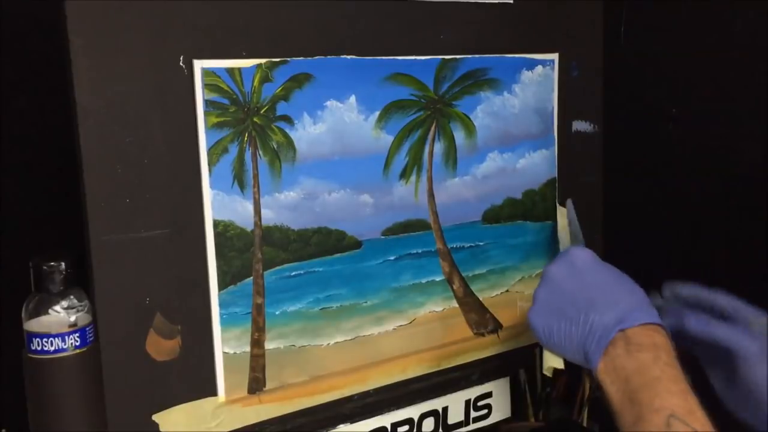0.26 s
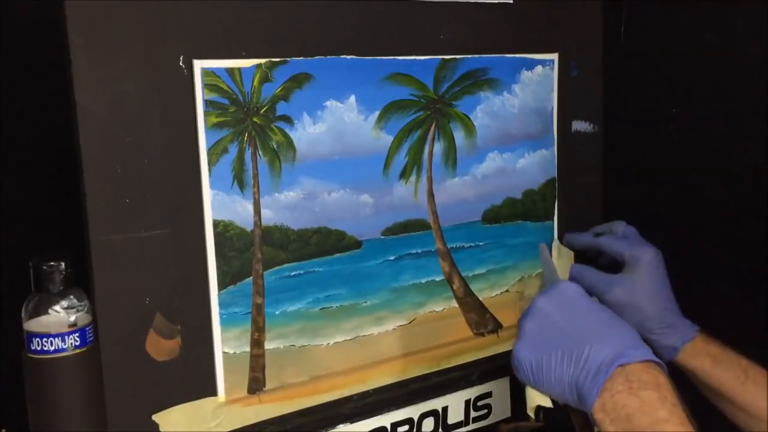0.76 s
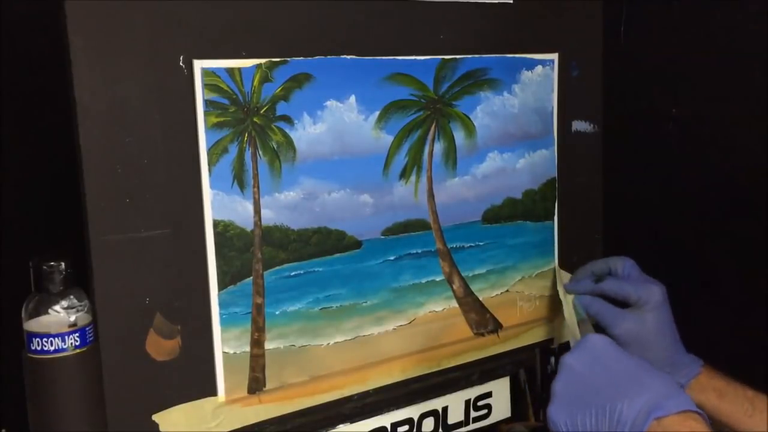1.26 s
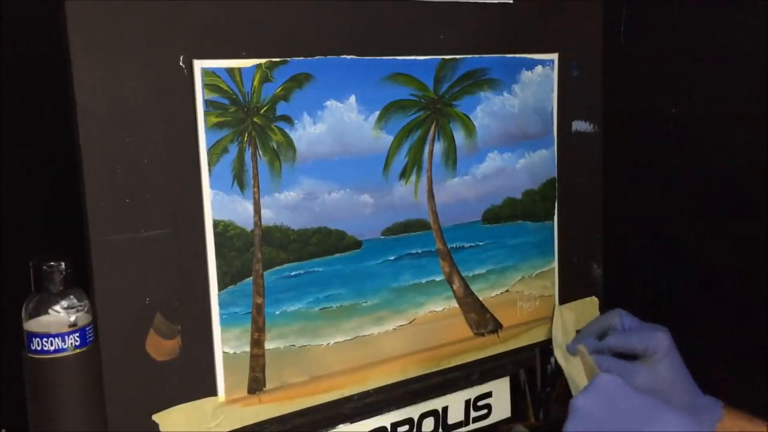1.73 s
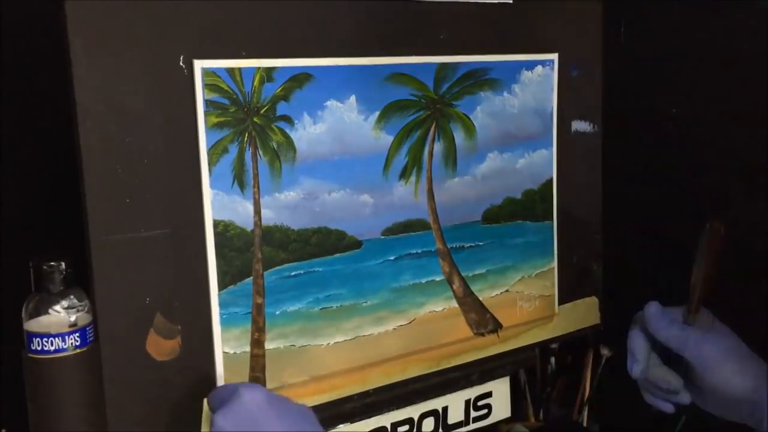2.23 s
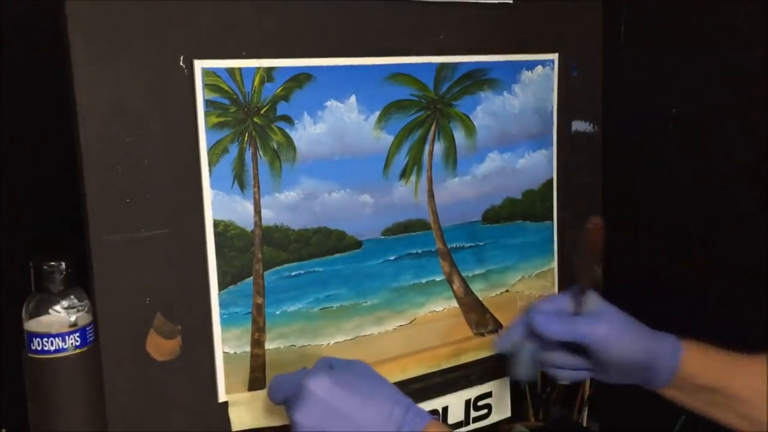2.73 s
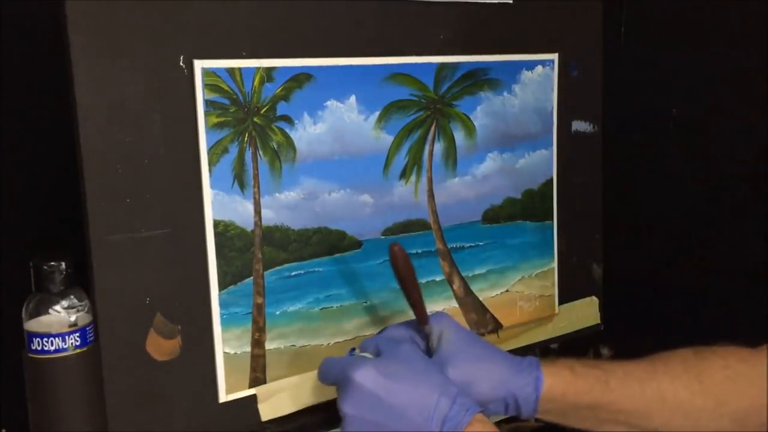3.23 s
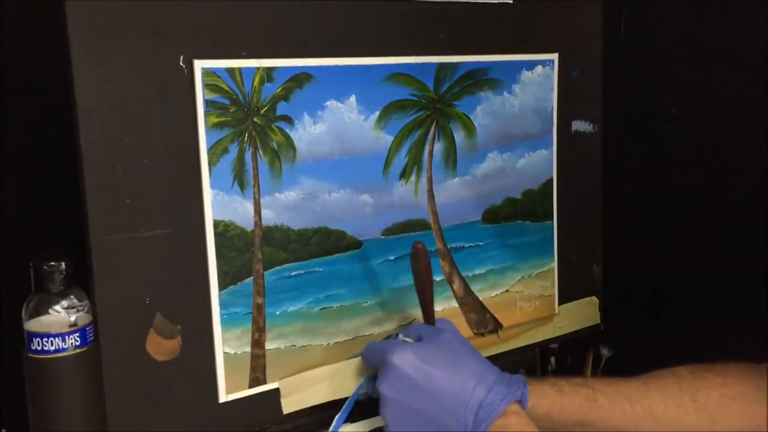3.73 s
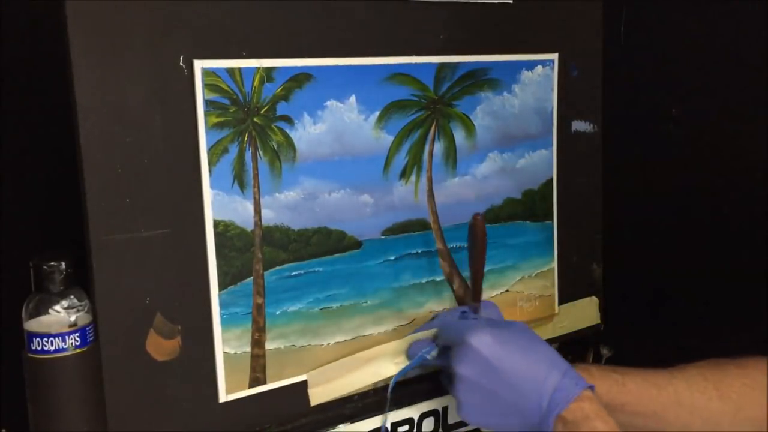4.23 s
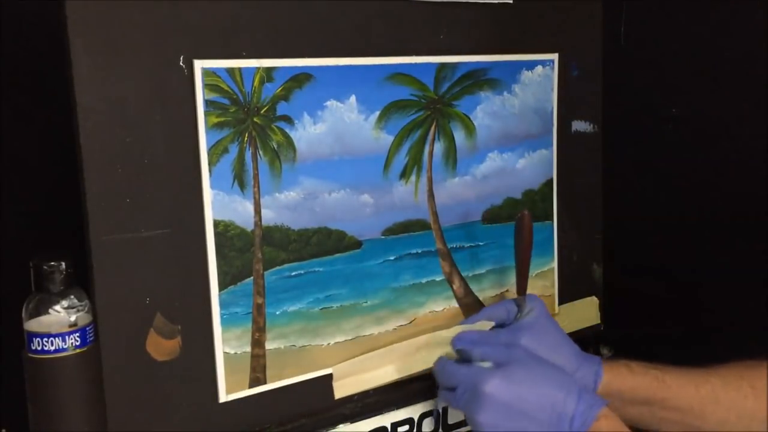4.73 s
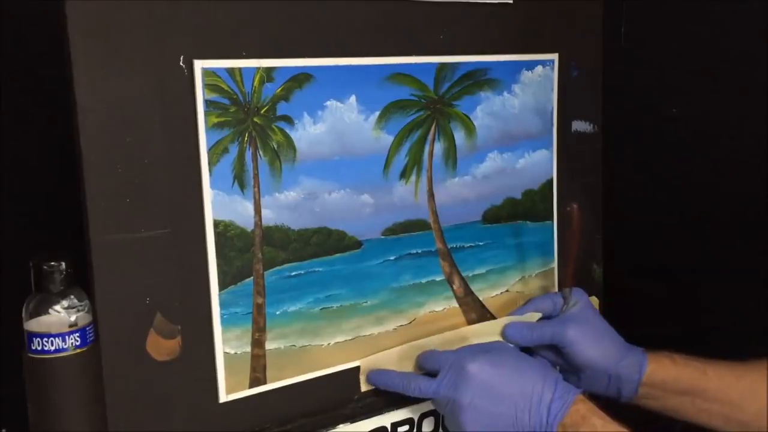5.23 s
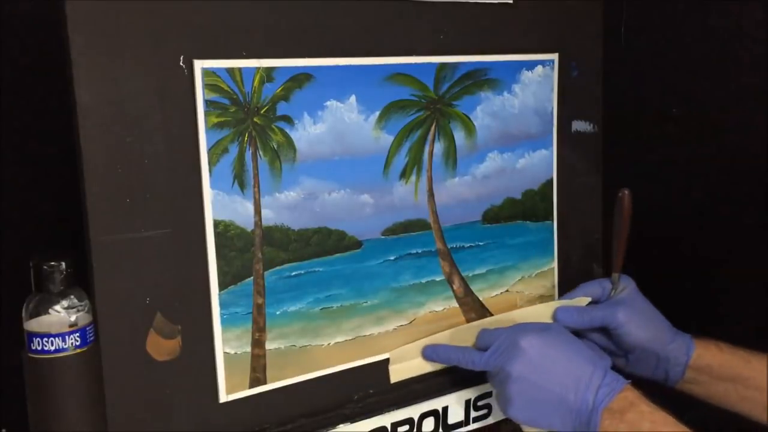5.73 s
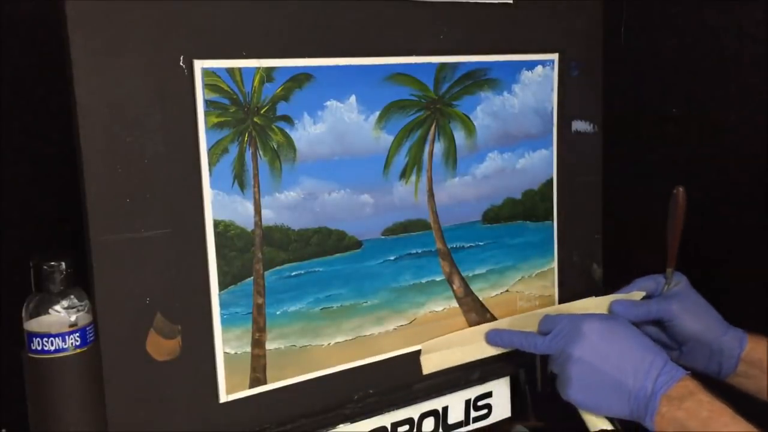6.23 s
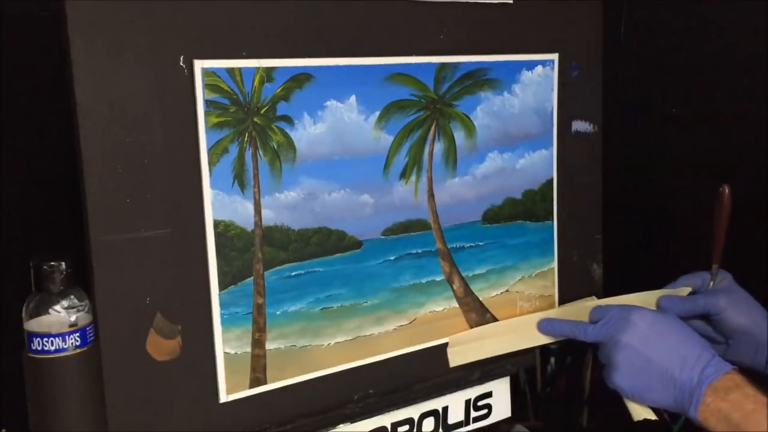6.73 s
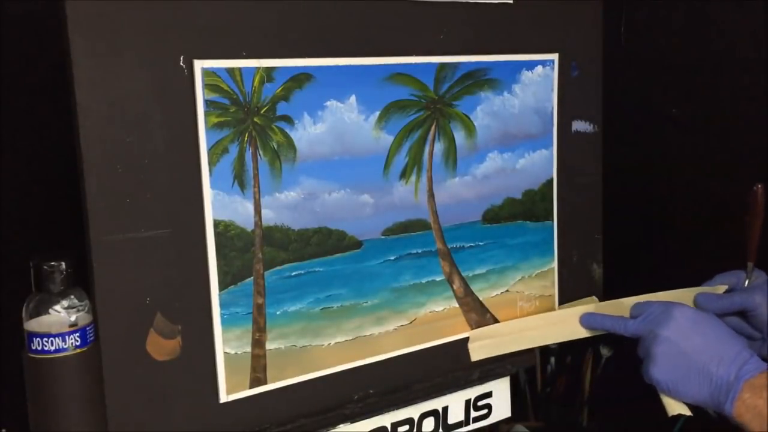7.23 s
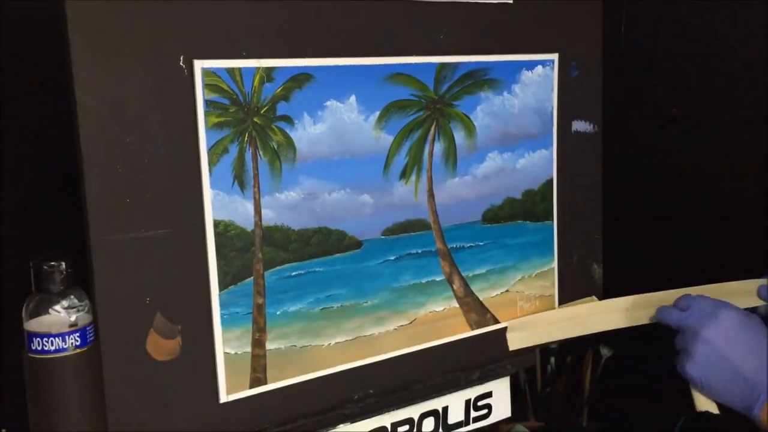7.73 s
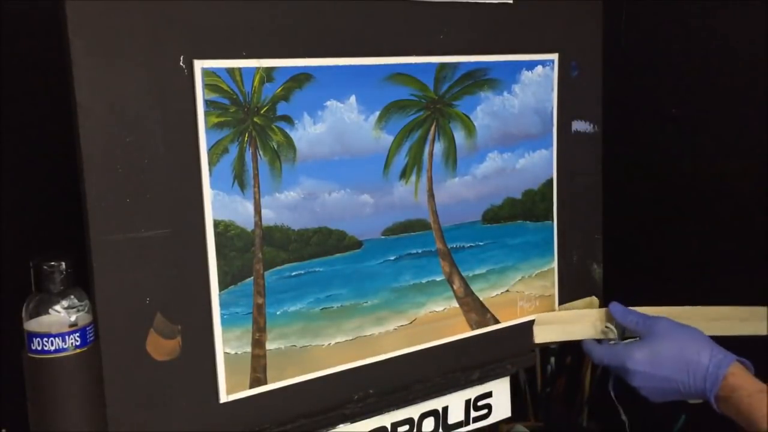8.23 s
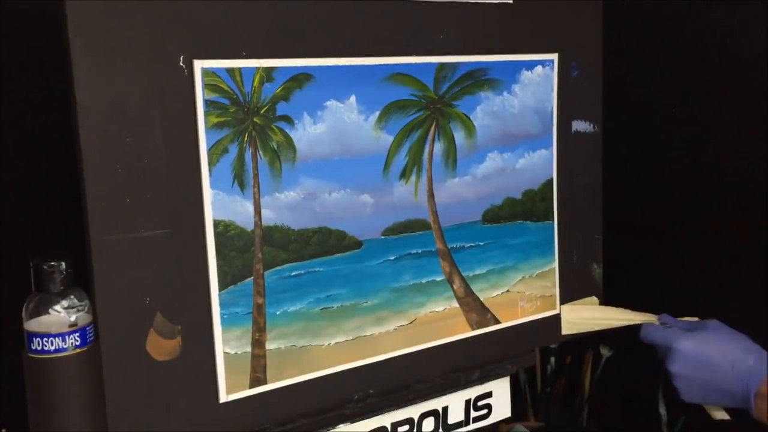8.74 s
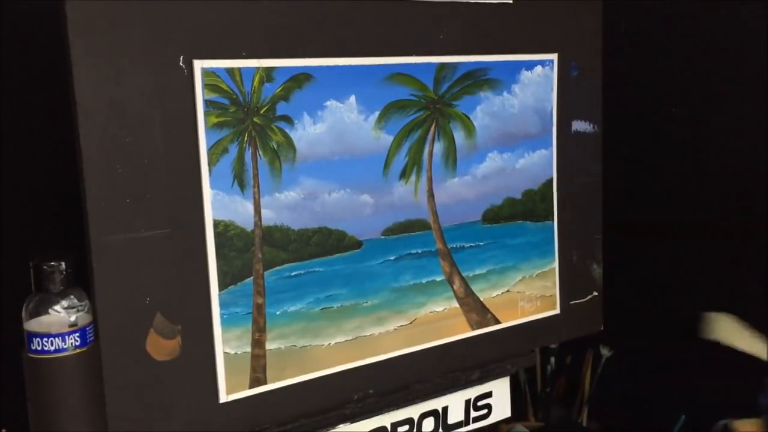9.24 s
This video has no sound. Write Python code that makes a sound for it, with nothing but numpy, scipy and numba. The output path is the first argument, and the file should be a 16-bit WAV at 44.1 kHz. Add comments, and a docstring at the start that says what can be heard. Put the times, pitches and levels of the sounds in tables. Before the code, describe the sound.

Close, dry sound of paper masking tape peeled from a board in a small room, over a faint low machine hum and soft dull background noise. A rasping rip opens at once, with a very loud snap at about 0.15 s, then shorter tears until 0.8. From 1.2 to 1.8 a smoother, even crackle runs, breaking into brisk rips around 1.8-2.2 as the first strip comes free. A quieter fumbling gap follows, with a few hollow snaps near 2.5-2.8 and a deep soft thump at 3.0. A sharp snap at 3.1 starts the next strip: sparse, uneven ticks to 4.7, more frequent crisp snaps from 4.8 to 6.8, a dip near 7, then dense crackle from 7.2 to 8. Low thumps fall near 4.1 and 6.0. Strong tears with frame jolts come at 8.45, 8.8 and 8.9, the hardest rip at 9.15-9.25, then last small ticks before 9.5.

```python
"""Paper masking tape is pulled off the edges of a painting on a board, an arm's length from a small microphone.
The glue lets go in a patchy crackle of noise bursts, one per tiny slip, and in lone snaps that ring the taut paper.
Two drifting resonances, narrow creases and a moving hollow colour the loose strip; the board knocks along.
The easel rumbles in filtered noise and deep thumps. A small room answers briefly over a low machine hum
and low background noise, strongest around 110 Hz."""
import sys
import numpy as np
from scipy import signal
from scipy.fft import rfft, irfft, next_fast_len
from scipy.io import wavfile
from scipy.ndimage import uniform_filter1d, map_coordinates
from numba import njit

SR = 44100
rng = np.random.default_rng(int(sys.argv[2]) if len(sys.argv) > 2 else 0)


def waveform_to_disk(signal):
    """Save audio, clipped to [-1, 1], as 16-bit WAV at the path in sys.argv[1]."""
    frames = np.transpose(np.atleast_2d(signal))
    scaled = np.clip(frames, -1, 1) * 32767
    samples = np.round(scaled).astype(np.int16)
    wavfile.write(sys.argv[1], SR, samples)


N = 417627
MS = np.arange(0, N / SR + .001, .001)  # times in seconds, a millisecond apart

# All crackle and snap levels are sends, ahead of the strip, mix trims and room.
# Steady pull on the tape between tugs: time_s, level_db
STEADY_PULL = [(0.0, -52), (0.3, -85), (0.62, -49.5), (0.84, -55), (1.0, -56), (1.12, -66.5), (1.22, -47),
               (1.79, -47.5), (1.96, -51), (2.01, -52), (2.2, -59), (2.253, -50), (2.26, -75), (2.3, -69),
               (3.04, -67), (3.2, -52.5), (3.43, -53), (3.54, -65.5), (3.77, -64), (3.86, -55.5),
               (4.73, -55), (5.7, -52), (6.0, -46.5), (6.9, -53), (6.99, -59), (7.36, -45), (7.8, -46.5),
               (7.93, -50), (8.15, -51.5), (8.4, -50.5), (8.66, -61), (9.47, -70)]
PULL_TREBLE_DB, PULL_BOARD_DB = -3.5, -20.5  # relative to the steady crackle
BOARD_REST_DB = -71  # floor under the board's share: it never rests quite
# Tugs that tear a stretch of glue at once: start_s, hold_s, level_db, treble_db, board_db (both re level)
TUGS = [(0.067, 0.13, -37.5, -10.5, -21), (0.414, 0.065, -41.5, -5.5, -18), (0.497, 0.066, -42, -7.5, -21),
        (0.686, 0.027, -49, -9, -20), (1.827, 0.082, -42, -0.5, -18), (1.93, 0.0057, -36, -2, -21),
        (2.051, 0.021, -39.5, 1, -24), (2.111, 0.011, -38.5, -4, -27), (2.167, 0.019, -42, -13, -11),
        (2.386, 0.12, -53, -5.5, -11), (2.544, 0.052, -49.5, -5, -15), (2.735, 0.1, -49, -9, -11),
        (2.854, 0.095, -48, -6, -9), (3.098, 0.049, -45.5, -4, -15), (3.222, 0.026, -48.5, -1, -24),
        (3.649, 0.025, -48.5, -5, -16), (4.328, 0.042, -52, -3, -9), (4.56, 0.033, -54, -13, -12),
        (4.834, 0.011, -46, -1, -17), (4.952, 0.037, -55, 3, -7.5), (5.235, 0.024, -50.5, -1.2, -23),
        (5.447, 0.012, -52, 1, -17), (5.59, 0.041, -53, 4, -13), (5.736, 0.011, -45, -3, -10.5),
        (5.994, 0.018, -52, 5, -10), (6.246, 0.037, -46.5, -1, -32), (6.495, 0.14, -49.5, -4, -15),
        (6.709, 0.039, -46, -8, -9.5), (7.033, .015, -60, -11, -32), (7.758, 0.051, -43.5, -4, -11.5),
        (8.065, 0.02, -44, -7, -18.5), (8.243, 0.053, -47, -3, -14), (8.432, 0.032, -39, -6, -14.5),
        (8.496, 0.065, -39, -7.5, -14.5), (8.568, 0.034, -45, -2, -10), (8.79, 0.027, -39, -7, -10),
        (8.933, 0.01, -38, -8, -9.5), (9.064, 0.01, -55, -10, -6), (9.159, 0.031, -32.5, -10, -10),
        (9.18, 0.046, -33.5, 0.5, -17), (9.231, 0.029, -33, -15, -8.5), (9.337, 0.03, -48, -19, -17),
        (9.426, 0.013, -40.5, -8, -14.5)]
TUG_RISE_DB_PER_S, TUG_FALL_DB_PER_S = 324, 248
# Louder snaps of the glue: start_s, peak_db, pitch_hz of the free paper, treble_db, board_db (both re peak)
SNAPS = [(0.0653, -26, 3730, -2, -29), (0.125, -20.5, 4390, -10, -18), (0.1485, -10.5, 1840, -10, -19),
         (0.1521, -3.5, 2840, -27, -23), (0.4093, -25.5, 3930, -5, -16), (0.431, -33, 4470, -8, -22),
         (0.482, -31.5, 3600, 6, -31), (0.5162, -28, 2120, -4, -26), (0.6364, -29, 6760, -2, -29),
         (0.6437, -31, 4310, -6, -25), (0.666, -30, 5400, -8, -30), (0.67, -26.5, 3760, -6, -32),
         (0.7637, -33.5, 5360, -4, -27), (0.868, -32, 5560, -8, -31), (0.974, -36, 7100, 0, -26),
         (1.1874, -37, 3980, -7, -22), (1.2061, -27, 3600, -10, -25), (1.235, -29, 4050, 4, -30),
         (1.319, -28, 4200, -1, -7), (1.39, -34, 4240, -4, -25), (1.459, -30, 2410, -5, -18),
         (1.5036, -23.5, 5600, -3, -20), (1.8462, -30, 6720, 5, -24), (1.86, -24, 6240, -9, -30),
         (1.8828, -26.5, 2360, 5, -17), (1.908, -29, 4520, 9, -30), (1.914, -18.5, 6890, 1, -27),
         (1.9213, -17.5, 5500, -2, -31), (1.935, -17, 6070, -6, -30), (2.0435, -20.5, 2130, -21, -24),
         (2.109, -25, 2600, -1, -9), (2.1127, -27, 1800, -2, -15), (2.121, -33, 2500, -7, -12),
         (2.1162, -18, 4140, 1, -13), (2.198, -29, 2700, 0, -2), (2.2035, -23.5, 2630, -17, 0),
         (2.38, -27.5, 1640, -8, -11), (2.5233, -18.5, 3100, -7, -13.5), (2.5397, -24.5, 6760, -2, -29),
         (2.7383, -16, 4000, -4.5, -16.5), (2.7605, -29, 2680, -5, -20), (2.7675, -26.5, 4050, 1, -17),
         (2.802, -26, 4260, -3, -19), (2.8168, -33, 5500, -3, -26), (2.8323, -16.5, 1680, -7, -17),
         (2.856, -29, 4250, -8, -24), (2.8667, -29, 4240, -6, -26), (2.873, -28.5, 4440, -12, -19),
         (3.0873, -10.5, 2800, -13, -25), (3.128, -23.5, 4050, -7, -35), (3.1796, -29, 4180, -3, -25),
         (3.203, -25.5, 5210, 3, -36), (3.2224, -32, 4220, -4, -33), (3.243, -26, 4360, -3, -35),
         (3.294, -25, 4420, -2, -34), (3.301, -25.5, 4390, 2, -34), (3.31, -26, 2520, -4, -30),
         (3.5872, -35.5, 2660, -2, -33), (3.621, -35, 4390, -2, -26), (3.6641, -26.5, 2550, -4, -11),
         (3.6822, -30, 5940, 1, -26), (3.865, -32, 6100, -6, -13), (3.9793, -26.5, 2280, -5, -8.5),
         (4.0148, -32, 2430, 1, -10), (4.0804, -35, 2330, 4, -9), (4.088, -20.5, 7450, -4, -15.5),
         (4.1339, -23.5, 7450, -6, -14.5), (4.1822, -31.5, 2110, 8.5, -13), (4.1884, -28.5, 1940, 1, -13),
         (4.2996, -27.5, 3920, 4, -21), (4.325, -27, 5680, -1, -28), (4.344, -23.5, 5600, -1, -15.5),
         (4.4224, -27, 5660, 4, -16), (4.5303, -17.5, 7750, 7.5, -38), (4.584, -28, 5140, 2.5, -24),
         (4.626, -24.5, 4340, -11, -35), (4.687, -30, 4540, -14, -13), (4.7887, -19.5, 4800, 2, -13),
         (4.8195, -33, 5730, -6, -27), (4.898, -21, 5800, -4, -37), (4.9318, -25.5, 5800, 2, -32),
         (4.955, -25, 2750, 4, -29), (4.96, -23.5, 5660, 1, -30), (4.9655, -23.5, 5800, -3, -32),
         (5.0226, -27.5, 5560, 2, -35), (5.0738, -23.5, 2740, 0, -15), (5.121, -32, 2500, -11, -22),
         (5.2158, -25.5, 5000, -2, -15), (5.2435, -34, 5300, 2, -24), (5.3012, -31, 2410, 1, -10),
         (5.3278, -25.5, 5100, -4, -37), (5.3523, -26.5, 2640, -3, -30), (5.446, -23.5, 7060, 0, -21),
         (5.5492, -30, 5600, 7, -29), (5.5534, -26, 5600, 4, -14), (5.58, -32, 5650, 0, -25),
         (5.619, -23.5, 7160, 4, -15.5), (5.656, -25.5, 5510, -1, -14.5), (5.6758, -28.5, 4690, 2, -14),
         (5.703, -29.5, 2650, 4, -25), (5.725, -25, 5470, -12, -22), (5.743, -17, 4540, -5, -21),
         (5.7672, -22.5, 5430, 3.5, -32), (5.806, -23, 2570, 3.5, -13.5), (5.858, -27.5, 2760, 1, -31),
         (5.879, -19, 3500, -1.5, -14), (5.8823, -20, 6140, -5, -20), (5.913, -26, 2930, -7, -23),
         (5.9365, -19.5, 2740, -6, -27), (5.9866, -15.5, 6030, -2, -29), (6.015, -23, 2670, 2, -18),
         (6.029, -24, 2710, -7, -18), (6.0463, -16.5, 5770, -12, -30), (6.0901, -26.5, 2500, 6, -36),
         (6.111, -19, 5810, -3.5, -16.5), (6.148, -28, 5250, 5, -27), (6.1978, -18.5, 2500, -3, -14),
         (6.23, -24.5, 2330, -3, -22), (6.2459, -20, 2300, -8, -17), (6.3157, -24.5, 2500, -6, -15),
         (6.479, -22.5, 5750, 0.5, -16), (6.5484, -19, 3500, -3, -11), (6.6742, -24.5, 2450, -3, -25),
         (6.6823, -20, 5560, -10, -14), (6.706, -28.5, 2500, -11, -12), (6.7554, -23, 7190, -5, -24),
         (6.7807, -23, 5850, -6, -19), (6.8207, -32, 2670, -3, -27), (6.8446, -20.5, 2570, 3.5, -14.5),
         (7.021, -26, 5640, 0, -24), (7.032, -30.5, 6930, 3, -35), (7.168, -27, 2500, 3, -38),
         (7.226, -35.5, 2530, 1, -18), (7.2588, -23.5, 6160, 4, -12), (7.2889, -29.5, 2530, -8, -28),
         (7.326, -30, 2430, -1, -24), (7.343, -28, 2500, 7, -32), (7.3701, -21, 2540, -1, -23),
         (7.4062, -23, 2500, 2, -26), (7.4174, -20.5, 5930, -7, -22), (7.449, -33, 5940, -4, -29),
         (7.4725, -18.5, 5810, -1.5, -33), (7.5115, -24.5, 5680, -6, -36), (7.525, -25.5, 5860, -10, -36),
         (7.5664, -22, 6500, 2, -23), (7.583, -27, 5860, -7, -30), (7.605, -23, 6930, -6, -30),
         (7.619, -29.5, 2630, -10, -25), (7.6416, -22, 3440, 0, -18), (7.661, -26, 5830, 2, -29),
         (7.685, -27, 5280, -1, -25), (7.704, -26, 5470, -11, -27), (7.7154, -17.5, 2800, 5, -15),
         (7.7534, -22, 5640, -9, -26), (7.7711, -23, 4740, -3, -25), (7.814, -24, 5770, -4, -17),
         (7.8327, -23, 2950, -6, -24), (7.8374, -20, 6930, 3, -28), (7.848, -26, 5900, -9, -29),
         (7.883, -27.5, 2700, -9, -17), (7.9132, -25, 2950, 0, -37), (7.9584, -23.5, 2910, 0, -33),
         (8.0267, -24, 6370, -3, -20), (8.0592, -20, 5700, 0, -18), (8.081, -29, 5920, -11, -24),
         (8.111, -32.5, 5680, 0, -9), (8.1813, -31.5, 3200, 0, -29), (8.196, -23, 5560, -11, -27),
         (8.2268, -28.5, 2370, 5, -26), (8.2418, -20, 6160, -7, -27), (8.264, -27.5, 6550, -3, -10),
         (8.299, -20.5, 6370, -4, -27), (8.3235, -31, 5120, 5, -20), (8.3554, -22.5, 2500, -6, -11.5),
         (8.489, -16, 2800, -5, -13), (8.554, -25, 4260, -13, -18), (8.592, -22.5, 4340, -1, -15),
         (8.7493, -28.5, 5680, -2, -22), (8.79, -23.5, 3360, -5, -3), (8.8102, -22, 5640, -13, -13),
         (8.9283, -25, 3320, -13, -18), (9.003, -34, 2000, -8, -20), (9.065, -23, 3270, -6, -13),
         (9.133, -20.5, 3450, -4, -13), (9.1638, -23, 2910, -10, -13), (9.1754, -24, 3230, -6, -12),
         (9.188, -25, 2710, 9, -19), (9.214, -24, 6240, -2, -20), (9.2396, -18, 3250, -4, -18),
         (9.271, -23.5, 2450, -12, 0), (9.3257, -25.5, 2100, -18, -8), (9.381, -25, 1920, -14, -29),
         (9.4266, -20, 2700, -2, -14)]
# Each snap sets off a short run of slips, relative to its peak; snaps above the top leave no louder run
TRAIL_DB, TRAIL_TOP_DB = -27.5, -27
TRAIL_RISE_DB_PER_S, TRAIL_FALL_DB_PER_S = 1300, 448
# Small snaps fall at random, their size following the pull; pulls above the top make them no larger
SMALL_OVER_PULL_DB, SMALL_SPREAD_DB, SMALL_TOP_PULL_DB = 9, 3.5, -44.5
SMALL_TREBLE_DB, SMALL_BOARD_DB = -3, -26.5  # middle values, relative to the small snap's peak
# The first strip comes away more smoothly: softer small snaps, evener crackle
SMOOTH_UNTIL_S, SMOOTH_DB, SMOOTH_PATCHY = 2.5, -8, 0.42

# Spectra below are relative density curves: freq_hz, level_db (per Hz)
# Body of the paper: freq_hz, level_db
PAPER = [(650, -8), (1100, -28), (1180, -6.5), (1380, -12.5), (1840, 2), (2750, 1.5), (4820, 4),
         (6140, 1.5), (7500, 2), (9750, -16.5), (16500, -120)]
# Treble of the paper's fibres: freq_hz, level_db
FIBRES = [(3820, -111.5), (6500, -41), (8240, 10.5), (9480, 15), (10600, 8.5), (12000, 14.5), (14500, 9.5),
          (16000, 14.5)]
# Board behind the tape: freq_hz, level_db
BOARD = [(300, -3.5), (480, -6), (620, 4), (780, 2.5), (950, 7), (1180, 3.5), (1450, 2), (2200, -14.5)]

# Two resonances of the loose strip, moving with its length and tension:
# time_s, low_hz, high_hz, low_lift_db, high_lift_db, through_db (level between them)
STRIP = [(0.0, 2530, 4100, -4, -14, -1), (0.2, 2520, 3900, 1, -6, -5), (0.45, 2070, 3780, -3, -6, -1),
         (0.72, 2040, 4100, -1, -2, 0.5), (0.9, 2500, 5400, -13, -4, -2), (1.2, 1640, 4140, -12, -12, 1),
         (1.7, 2400, 4500, -8, -23, -2.5), (1.95, 2380, 4270, -6, 6, 0.5),
         (2.3, 2700, 4800, 3.5, -27, -0.5), (3.1, 2900, 3930, -5, 0.5, -1.5),
         (3.9, 2350, 4730, 9.5, -1, -3), (4.2, 2180, 5100, -1, -20, 0), (4.5, 2770, 5140, 4.5, -2.5, -0.5),
         (5.5, 2740, 5330, 6, 4, -3.5), (6.3, 2570, 5500, 1.5, -11, -2), (7.0, 2700, 5600, 9.5, -1.5, -1),
         (7.5, 2700, 5500, 1.5, -0.5, -0.5), (8.2, 2930, 6050, -1, -3.5, -2.5),
         (8.5, 2820, 3970, 1, 0, 0.5), (8.8, 2900, 5470, 9, 2, -6), (9.15, 3180, 5860, 7.5, -25, 0),
         (9.47, 1920, 5700, -2, -27, -1.5)]
STRIP_SHARPNESS, STRIP_FLUTTER = 5, .045  # Q; spread as a fraction of the frequency
# Creases in the paper, each ringing narrowly: centre pitch_hz
CREASE_HZ = (1688, 2442, 3400, 4260, 5590, 6110)
CREASE_DB, CREASE_SHARPNESS = -4, 41.4  # middle level; Q
# A hollow in the colour drifts as the strip lifts off the board: time_s, centre_hz, depth (0-1)
HOLLOW = [(0.0, 3230, 0.16), (1.5, 5150, 0.36), (2.5, 4200, 0.73), (3.3, 3680, 0.3), (4.7, 3700, 0.2),
          (5.55, 3950, 0.4), (6.4, 4400, 0.15), (7.0, 4650, .9), (7.35, 4500, 0.6), (8.0, 4570, 0.35),
          (9.47, 4700, 0.1)]

# Hands and tape knock on board and frame: start_s, peak_db (ahead of the room), pitch_hz
KNOCKS = [(1.458, -49, 147), (1.798, -49, 287), (1.884, -50, 1127), (1.921, -49, 293), (1.951, -47, 1090),
          (2.066, -49, 740), (2.108, -48, 1056), (2.11, -47, 464), (2.195, -45, 1186), (2.528, -48, 260),
          (6.197, -50, 342), (7.4, -47, 430), (7.601, -47, 169), (7.76, -40.5, 308), (7.863, -48, 280)]
KNOCK_RISE_S, KNOCK_FADE_S = 0.0015, 0.018

# The easel shudders under the hands: time_s, frame_db, deep_db (middle levels)
EASEL = [(0.0, -64, -55), (1.08, -65, -58), (1.32, -64.5, -48.5), (2.1, -60.5, -52.5), (2.42, -67.5, -61),
         (3.1, -63, -55.5), (3.8, -65.5, -72), (4.4, -67, -56), (5.4, -66.5, -57.5), (6.6, -58.5, -54),
         (7.25, -54.5, -54.5), (7.6, -56.5, -53.5), (8.4, -63, -53), (9.47, -65, -51.5)]
SHUDDER_DB = 1.8  # spread of the wavering level
# Frame rumble: freq_hz, level_db
FRAME = [(90, -32), (150, 3.5), (215, -0.5), (250, 2), (290, 3), (420, -4), (600, -22), (900, -32)]
# Deep rumble: freq_hz, level_db
DEEP = [(22, -32), (36, -11), (50, 2.5), (62, -1), (78, 0), (95, -46)]
# Jolts of the frame under hard tugs: start_s, hold_s, level_db
JOLTS = [(2.17, 0.013, -52), (2.53, 0.012, -60.5), (8.45, 0.068, -44.5), (8.775, 0.029, -47),
         (8.93, 0.019, -47), (9.17, 0.059, -45)]
JOLT_RISE_DB_PER_S, JOLT_FALL_DB_PER_S = 250, 172
# Colour of the jolts: freq_hz, level_db
JOLT = [(110, -11), (200, 0.5), (290, 5.5), (420, -1), (620, -1.5), (950, -38)]
# A hand leans on the easel: start_s, level_db, pitch_hz
THUMPS = [(2.248, -50, 55.7), (3.002, -38.5, 50.3), (4.059, -43, 53.6), (6.029, -43, 52.3)]

# Nearby surfaces: delay_s, level_db (re direct sound)
ECHOES = [(.0035, -15), (.0062, -24.5), (.0098, -31)]
ROOM_T60_S, ROOM_DB = 0.16, -10  # decay time; wash re direct sound
SIDE_DB = -36.5  # level of the left-right noise response, before its high-pass

# Machine tones: pitch_hz, level_db (rms, before wavering), waver_db
HUM = [(50.6, -53.5, -1.5), (98.3, -67.5, 6), (100, -68, 4), (103, -65.5, 3), (126.5, -69, 5)]
# Low background noise, strongest around 110 Hz, with a faint hiss above: freq_hz, level_db
BACKGROUND = [(65, -13), (110, 16.5), (167, 3.5), (293, -29), (483, -26), (1520, -11), (2500, -14),
              (5410, -15), (13300, -42), (16000, -30)]
BACKGROUND_DB = -63.5  # middle level, rms
TOP_HZ = 15750  # where the microphone's treble ends


def pull():
    """Steady pull, snap trails and tugs add as power; returns level, treble share and board share in dB."""
    steady = undb(np.interp(MS, *np.transpose(STEADY_PULL))) ** 2
    trails = [(s, 0, min(db, TRAIL_TOP_DB) + TRAIL_DB) for s, db, *_ in SNAPS]
    steady = steady + swells(trails, TRAIL_RISE_DB_PER_S, TRAIL_FALL_DB_PER_S).sum(axis=0)
    tugs = swells(TUGS, TUG_RISE_DB_PER_S, TUG_FALL_DB_PER_S)
    treble_db, board_db = np.transpose(TUGS)[3:]
    total = steady + tugs.sum(axis=0)
    treble = steady * undb(PULL_TREBLE_DB) ** 2 + undb(treble_db) ** 2 @ tugs
    board = steady * undb(PULL_BOARD_DB) ** 2 + undb(board_db) ** 2 @ tugs
    board = board + undb(BOARD_REST_DB) ** 2
    return per_sample(total), per_sample(treble / total), per_sample(board / total)


def slips(rate, spread_db, fade_s, patchy_db):
    """Many small releases of glue, some larger than the rest, each a noise burst that dies at once."""
    patchy = np.where(np.arange(N) < SMOOTH_UNTIL_S * SR, SMOOTH_PATCHY, 1)
    patchy = patchy * (rate.min() / rate) ** 0.28  # a full rip runs evener
    odd = np.minimum(rng.exponential(size=N), 3.2)
    happens = rng.random(N) < rate / SR
    size = happens * undb(spread_db * odd + patchy_db * patchy * walk(45))
    power = signal.lfilter([1], [1, -np.exp(-2 / (fade_s * SR))], size ** 2)
    # level out the slow swells: only the fine grain stays
    local_power = uniform_filter1d(power, size=SR // 8).clip(1e-9)
    return np.sqrt(power / local_power) * rng.standard_normal(N)


def crackle(effort):
    """Shared slips sound through paper, fibres and board, each with noise of its own; returns body, rest."""
    pull_db, treble_db, board_db = effort
    # the harder the pull, the closer the slips follow each other, until they merge into a rip
    rate = 300 + 2800 * np.clip(undb(pull_db + 29.5), 0, 1)
    shared = slips(rate, spread_db=1.0, fade_s=0.0025, patchy_db=3.5)
    # among them, dry pinpricks where single spots of glue part
    shared = shared + .45 * slips(rate / 2, spread_db=5.5, fade_s=.00015, patchy_db=3)
    paper_slips = slips(rate, spread_db=4.5, fade_s=.0005, patchy_db=3)
    body = colour(shared + .55 * paper_slips, PAPER)
    fibre_slips = slips(rate, spread_db=4.5, fade_s=.0003, patchy_db=4)
    treble = colour(shared + .55 * fibre_slips, FIBRES)
    board_noise = undb(SHUDDER_DB * walk(40)) * rng.standard_normal(N)
    board = colour(0.73 * shared + board_noise, BOARD)
    level = undb(pull_db)
    return level * body, level * (undb(treble_db) * treble + undb(board_db) * board)


def small_snaps(pull_db, count=650):
    """Rows like SNAPS: random moments, ringing near one of the strip's two resonances."""
    when, size, which = rng.random((count, 3)).T
    pitch, treble, board = rng.standard_normal((count, 3)).T
    at = (when * (N - 1)).astype(int)
    low_hz, high_hz = curves(STRIP)[:2]
    ring_hz = np.where(which < .45, low_hz[at], high_hz[at]) * np.exp(.15 * pitch)
    peak_db = pull_db[at].clip(max=SMALL_TOP_PULL_DB) + SMALL_OVER_PULL_DB
    peak_db = peak_db - SMALL_SPREAD_DB * np.log(1 - .9 * size)  # a few come out much larger
    peak_db = peak_db + SMOOTH_DB * (at < SMOOTH_UNTIL_S * SR)
    treble_db = SMALL_TREBLE_DB + 3 * treble
    board_db = SMALL_BOARD_DB + 5 * board
    return np.transpose([at / SR, peak_db, ring_hz, treble_db, board_db])


def snaps(pull_db, rise_s=0.000099, fade_s=0.00032, tail_s=0.0036, tail_db=-17, sharpness=3.8,
          body_db=-4, bounce=0.43):
    """A brief noise burst rings the paper at its pitch, ticks the treble, knocks the board; returns body, rest."""
    rows = np.vstack([SNAPS, small_snaps(pull_db)])
    s, peak_db, ring_hz, treble_db, board_db = rows.T[:, :, None]
    size = 1024
    t = np.arange(size) / SR
    freq_hz = np.fft.rfftfreq(size, 1 / SR)
    noise = (1 - np.exp(-t / rise_s)) * rng.standard_normal((len(s), size))
    # the crack itself, then the freed paper rattles on unevenly for a moment
    steps = np.repeat(rng.standard_normal((len(s), size // 32)), 32, axis=1)
    rattle = undb(tail_db + 5.85 * steps)
    burst = rfft(noise * (np.exp(-t / fade_s) + rattle * np.exp(-t / tail_s)))
    # it bounces off the board a hand's breadth away, a little differently each time
    late_s = 0.0004087 + 0.000704 * rng.random((len(s), 1))
    burst = burst * (1 + bounce * np.exp(-2j * np.pi * freq_hz * late_s))
    # band-pass resonance of the free paper
    ratio = 1j * freq_hz / ring_hz
    ring = ratio / sharpness / (1 + ratio / sharpness + ratio ** 2)
    body_gain = ring + undb(body_db) * shape(PAPER, size)
    parts = [irfft(burst * gain) for gain in (body_gain, shape(FIBRES, size), shape(BOARD, size))]
    body, treble, board = (p / np.abs(p).max(axis=1, keepdims=True) for p in parts)
    rest = undb(treble_db) * treble + undb(board_db) * board
    # the filters ring ahead of the burst too: a quarter of each window is kept for that
    lead = size // 4
    out = np.zeros((2, N + 2 * size))
    at = (s * SR).astype(int) + np.arange(size)
    for track, sound in zip(out, (body, rest)):
        np.add.at(track, at, np.roll(undb(peak_db) * sound, lead, axis=1))
    return out[:, lead:lead + N]


def strip(x):
    """The shaken loose strip lifts two fluttering bands; creases ring narrowly and a drifting hollow is cut."""
    low_hz, high_hz, low_db, high_db, through_db = curves(STRIP)
    low = band(x, low_hz * (1 + STRIP_FLUTTER * walk(20)), STRIP_SHARPNESS)
    high = band(x, high_hz * (1 + STRIP_FLUTTER * walk(20)), STRIP_SHARPNESS)
    creases = np.zeros(N)
    for hz in CREASE_HZ:
        gain = undb(CREASE_DB + 5.3 * walk(9))  # each comes and goes
        creases += gain * band(x, hz * np.exp(0.033 * walk(3)), CREASE_SHARPNESS)
    x = undb(through_db) * (x + creases) + undb(low_db) * low + undb(high_db) * high
    hollow_hz, depth = curves(HOLLOW)
    notch = band(x, hollow_hz * np.exp(0.11 * walk(7)), 5.5)
    return x - depth.clip(0, 1) * notch


def knocks():
    """Each knock on board or frame is a sine that swells in a few milliseconds and rings out."""
    out = np.zeros(N + SR)
    t = np.arange(SR // 8) / SR
    envelope = (1 - np.exp(-t / KNOCK_RISE_S)) * np.exp(-t / KNOCK_FADE_S)
    for s, db, hz in KNOCKS:
        ring = envelope * np.sin(2 * np.pi * hz * t)
        start = int(s * SR)
        out[start:start + len(t)] += undb(db) * ring / ring.max()
    return out[:N]


def easel(fade_s=0.03):
    """Uneven noise rumbles and jolts in the frame, with soft pushes of a cycle or two of deep bass."""
    frame_db, deep_db = curves(EASEL)
    jolts = swells(JOLTS, JOLT_RISE_DB_PER_S, JOLT_FALL_DB_PER_S).sum(axis=0)
    jolt_db = per_sample(jolts + 1e-12)
    out = undb(frame_db + SHUDDER_DB * walk(18)) * colour(rng.standard_normal(N), FRAME)
    out += undb(jolt_db + SHUDDER_DB * walk(40)) * colour(rng.standard_normal(N), JOLT)
    out += undb(deep_db + SHUDDER_DB * walk(10)) * colour(rng.standard_normal(N), DEEP)
    for s, db, hz in THUMPS:
        t = (np.arange(N) / SR - s).clip(0)
        out += undb(db) * np.exp(-t / fade_s) * np.sin(2 * np.pi * hz * t)
    return out


def room(x):
    """Near echoes, then a short wash; apart from these, a faint noisy smear above 500 Hz is added to one
    channel and subtracted from the other."""
    t = np.arange(int(.4 * SR)) / SR
    envelope = undb(-60 * t / ROOM_T60_S) * (1 - np.exp(-t / 0.0015))
    wash = rng.standard_normal((2, len(t))) * envelope
    wash /= np.sqrt(np.sum(wash ** 2, axis=1, keepdims=True))
    mid_response = undb(ROOM_DB) * wash[0]
    mid_response[0] = 1  # direct sound
    for s, db in ECHOES:
        mid_response[int(s * SR)] += undb(db)
    mid = signal.fftconvolve(x, mid_response)[:N]
    side = signal.fftconvolve(x, undb(SIDE_DB) * wash[1])[:N]
    side = signal.sosfilt(signal.butter(2, 500, "high", fs=SR, output="sos"), side)
    return np.array([mid + side, mid - side])


def hum():
    """A machine drones on a few wavering sines, close ones beating, over low filtered background noise."""
    noise = colour(rng.standard_normal(N), BACKGROUND)
    out = undb(BACKGROUND_DB + 1.8 * walk(6.3)) * noise
    for hz, db, waver_db in HUM:
        phase = 2 * np.pi * (hz * np.arange(N) / SR + rng.random()) + 0.1 * walk(4.1)
        out = out + np.sqrt(2) * undb(db + waver_db * walk(6.5)) * np.sin(phase)
    return out


def undb(db):
    """dB to gain."""
    return 10 ** (np.asarray(db) / 20)


def unit(x):
    """Scale to rms 1."""
    return x / np.sqrt(np.mean(x ** 2))


def shape(table, size):
    """Gain of a spectrum at the bins of a transform of this size."""
    hz, db = np.transpose(table)
    return undb(np.interp(np.log(np.fft.rfftfreq(size, 1 / SR) + 1), np.log(hz), db))


def colour(x, table):
    """Filter by a spectrum; rms 1."""
    size = next_fast_len(N)
    return unit(irfft(rfft(x, size) * shape(table, size), size)[:N])


def walk(rate):
    """Random levels joined smoothly, rate of them a second; rms 1."""
    points = rng.standard_normal(int(N / SR * rate) + 4)
    coarse = np.arange(0, N + 64, 64)
    smooth = map_coordinates(points, [coarse * rate / SR], order=2)
    return unit(np.interp(np.arange(N), coarse, smooth))


def curves(table):
    """Columns of a table after its time column, one value a sample."""
    s, *columns = np.transpose(table)
    return [np.interp(np.arange(N) / SR, s, c) for c in columns]


def swells(table, rise_db_per_s, fall_db_per_s):
    """Power of each event every millisecond: it rises to its start, holds, and falls away."""
    s, hold_s, db = np.transpose(table)[:3, :, None]
    before_s = (s - MS).clip(0)
    after_s = (MS - s - hold_s).clip(0)
    return undb(db - rise_db_per_s * before_s - fall_db_per_s * after_s) ** 2


def per_sample(power):
    """Millisecond powers to dB, one value a sample."""
    return np.interp(np.arange(N) / SR, MS, 10 * np.log10(power))


@njit
def svf(x, g, sharpness):
    """State-variable band-pass with a moving centre, g = tan(pi f / SR), gain 1 there."""
    y, band_state, low_state, damping = np.empty(len(x)), 0., 0., 1 / sharpness
    for i in range(len(x)):
        v = (band_state + g[i] * (x[i] - low_state)) / (1 + g[i] * (g[i] + damping))
        band_state = 2 * v - band_state
        low_state += 2 * g[i] * v
        y[i] = damping * v
    return y


def band(x, hz, sharpness):
    """Band-pass following a centre frequency given for every sample."""
    return svf(x, np.tan(np.pi * hz / SR), 1. * sharpness)


def scene(paper_db=-5, snap_db=-3):
    """Crackle and snaps both ring the loose strip; tape and knocks go through the room, easel and hum do not."""
    effort = pull()
    body, rest = crackle(effort)
    snap_body, snap_rest = snaps(effort[0])
    paper = strip(undb(paper_db) * body + undb(snap_db) * snap_body)
    return room(paper + rest + snap_rest + knocks()) + easel() + hum()


def record(dry):
    """The microphone drops the deepest bass and cuts the top."""
    dry = signal.sosfilt(signal.butter(4, 38, "high", fs=SR, output="sos"), dry)
    return signal.sosfilt(signal.ellip(12, .2, 85, TOP_HZ, fs=SR, output="sos"), dry)


dry = scene()
out = record(dry)
waveform_to_disk(out)
```